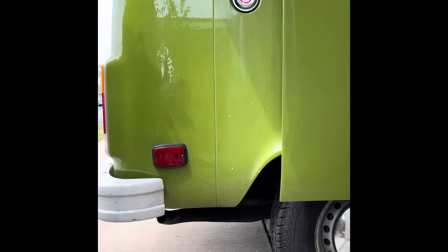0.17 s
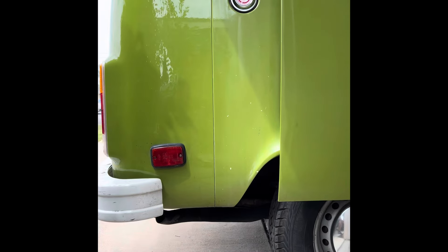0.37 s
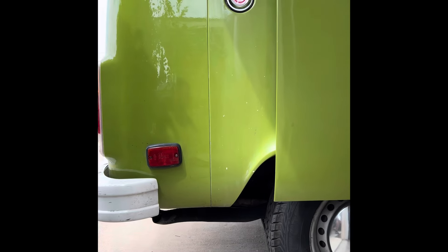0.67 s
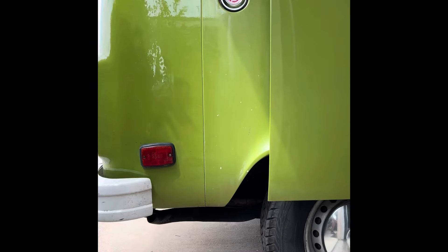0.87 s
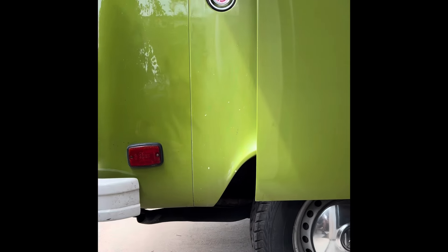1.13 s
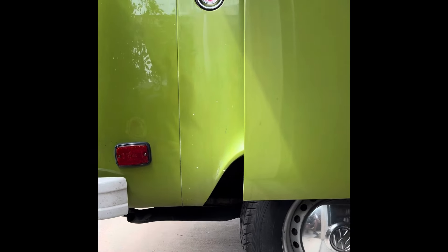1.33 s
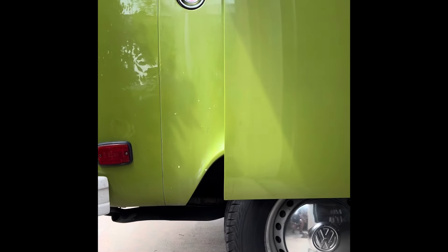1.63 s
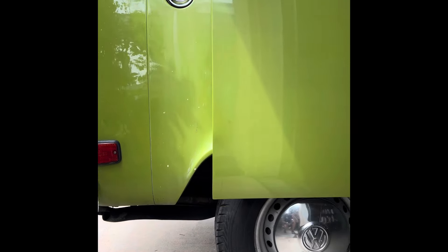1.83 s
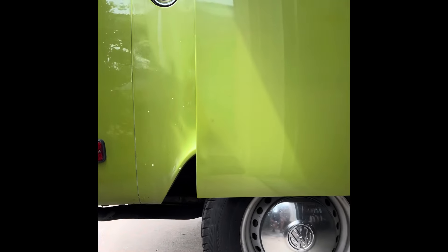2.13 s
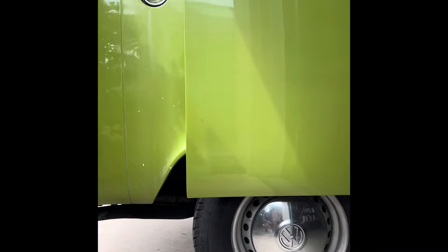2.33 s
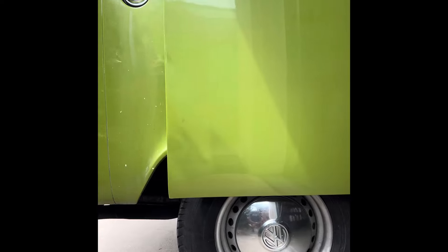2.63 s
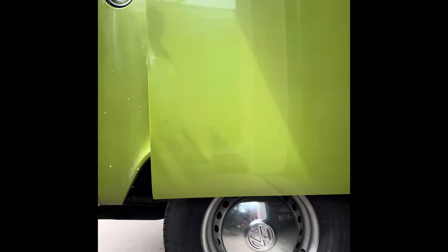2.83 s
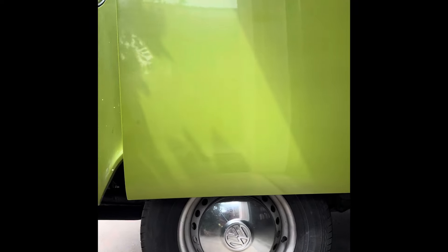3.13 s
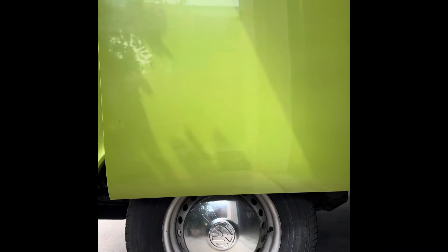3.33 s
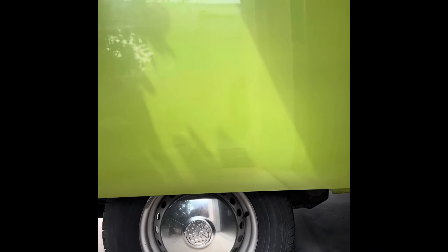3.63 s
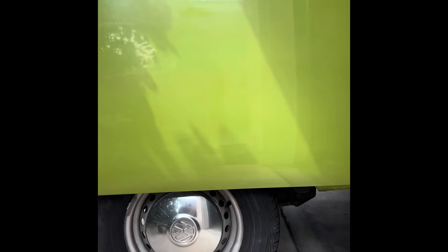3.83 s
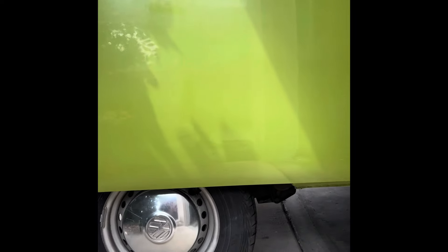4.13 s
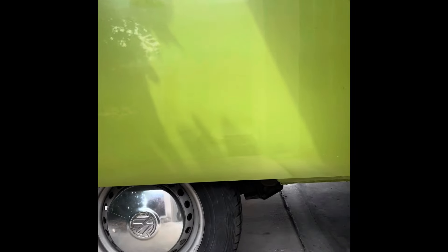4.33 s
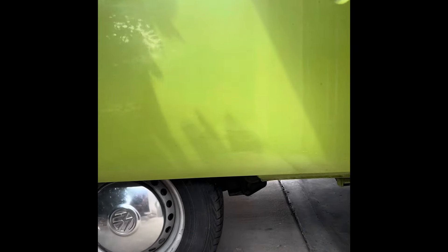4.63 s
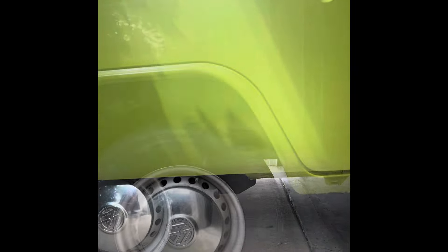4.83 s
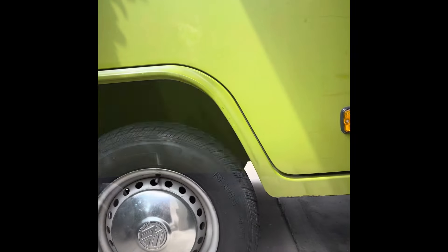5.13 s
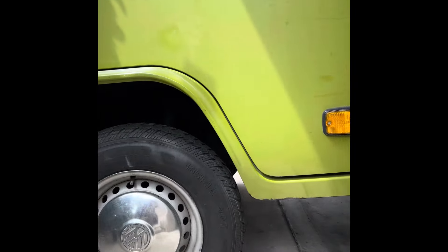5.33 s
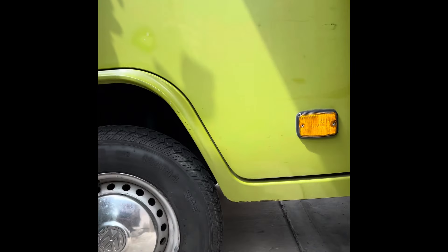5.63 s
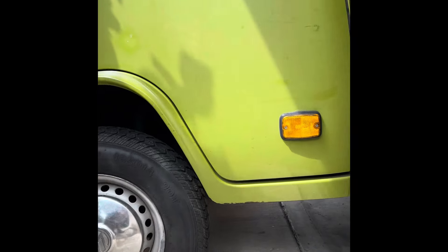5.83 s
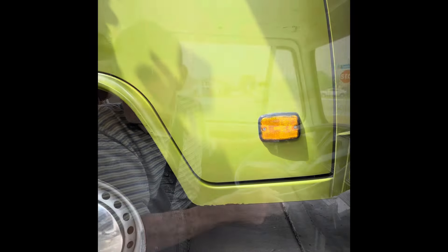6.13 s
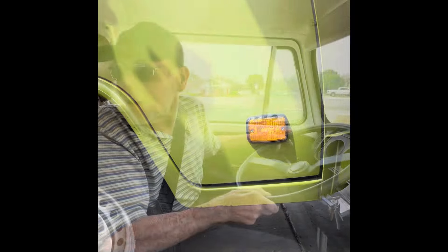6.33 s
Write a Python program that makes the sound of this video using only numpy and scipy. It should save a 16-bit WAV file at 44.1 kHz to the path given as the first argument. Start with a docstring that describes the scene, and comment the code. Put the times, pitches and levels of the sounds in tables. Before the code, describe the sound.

Outdoors, close to an old van, a phone picks up its air-cooled four-cylinder engine. It revs up quickly and holds with a deep exhaust boom and fan hiss, surges higher, then falls to a slow, uneven idle with a loose metal shield knocking and valves ticking. Near five seconds the sound becomes suddenly quieter, as if heard from beside the front wheel, and fades a little at the end.

```python
"""The exhaust of an air-cooled four-cylinder engine in the back of a van booms: waves locked to the engine cycle.
A loose shield knocks, hardest once a cycle; the valves tick as small bursts of ringing.
Shaped noise makes the rush of exhaust gas and the hiss of the cooling fan.
The engine is revved up, held and let fall to idle, then heard from beside the front wheel.
A phone listens through two microphone ports, which hear the same bass."""
import sys
import numpy as np
from scipy.fft import rfft, irfft, next_fast_len
from scipy.io import wavfile
from scipy.ndimage import uniform_filter1d, map_coordinates

SR = 44100
rng = np.random.default_rng(int(sys.argv[2]) if len(sys.argv) > 2 else 0)


def pcm_store(signal):
    """Save signal as 16-bit PCM."""
    levels = np.round(np.clip(np.atleast_2d(signal), -1, 1) * 32767)
    wavfile.write(sys.argv[1], SR, levels.astype(np.int16).T)


N = 286209

# A cycle is two turns of the crank. "Three states" are: revved, idling at the rear, idling at the front.

# waves per engine cycle (order): (level/dB in the three states), before the changes in exhaust()
ORDER_LEVELS = dict(zip( (3, 4, 5, 6, 7, 8, 9, 10, 11, 12, 13, 14, 15, 16, 17, 19, 20, 24, 28, 32, 33, 36, 40),
                [(-11.5, -16, -14), (-7, -4.5, -8), (3, -7, -19.5), (-12, -25, -24), (-7, -3, -6),
                (-3, -4, -8.5), (-6, -1.5, -2.5), (-8, -15, -10), (-5, -6.5, -9), (-3, -3, -2.5),
                (-7, -5, -1.5), (-18, -13, -11), (-12, -15.5, -7), (-6, -1, -.5), (-15, -9, -5.5),
                (-18, -12, -12.5), (-19, -2.5, -12), (-9, -14, -7.5), (-14, -17, -19.5), (-11, -16, -12.5),
                (-15, -16, -23.5), (-15, -22, -24), (-10, -17, -17.5)]))
# shape of the throb, one row per state: (middle order, a/cycles, b/cycles, c/cycles);
# phase = a + b m + c m^2, with m counted from the middle order
THROB = [(5, .99, .46, .365), (8, .5, -.045, .02), (8, .2, -.065, .13)]
# how a wave swells or sinks in the exhaust pipe: (f/Hz, level/dB)
PIPE = [(20, -13), (33, 3.5), (45, 8), (54, 12.5), (65, 11), (72, 7.5), (80, 1), (95, 2), (160, -4.5)]
# the silencer's resonance and notch: (f/Hz, level/dB)
SILENCER = [(215, 0.5), (245, 8.5), (280, 2), (570, 4), (620, -12.5)]
# factor on the wavering in the three states
UNEVEN = (.6, 1.8, 2.5)
SPREAD_BELOW_SPEED, SPREAD_PER_SPEED = 7.1, .04  # cycles/s; c gained per cycle/s below it, at the rear idle
GROW_FROM_ORDER, HELD_SPEED = 13, 14  # order; cycles/s
GROW_DB = .07  # per order above that and per cycle/s over the held speed
BURIED_DB_PER_GAIN = .03  # sinking per order and per cycle/s gained each second
# dB per cycle/s lost each second: gains of the firing and lowest orders, loss of the others
FIRING_DB_PER_SLOWING, LOWEST_DB_PER_SLOWING, OVERRUN_DB_PER_SLOWING = .2, .7, .3
OVERRUN_FROM_ORDER = 5  # lowest order that weakens


def exhaust(cycle, speed, state, level_db):
    """Waves locked to the cycle; firings are never quite alike, so each wavers, the high ones most."""
    out = np.zeros(N)
    uneven = np.array(UNEVEN) @ state
    lost, gained = slowing(speed), slowing(-speed)
    spread = SPREAD_PER_SPEED * np.maximum(SPREAD_BELOW_SPEED - speed, 0) * state[1]
    for order, strengths_db in ORDER_LEVELS.items():
        # when revved, the upper orders grow with speed but sink while it rises
        growth = GROW_DB * (speed - HELD_SPEED) - BURIED_DB_PER_GAIN * gained
        grown_db = max(order - GROW_FROM_ORDER, 0) * growth * state[0]

        # as the engine slows, the lowest and the firing orders stand out
        if order == min(ORDER_LEVELS):
            slowing_db = LOWEST_DB_PER_SLOWING
        elif order % 4 == 0:
            slowing_db = FIRING_DB_PER_SLOWING
        else:
            slowing_db = -OVERRUN_DB_PER_SLOWING * (order >= OVERRUN_FROM_ORDER)

        hz = order * speed
        db = level_db + np.array(strengths_db) @ state + grown_db + lost * slowing_db
        db = db + along(PIPE, hz) + along(SILENCER, hz)

        # blend the phases of the three states as arrows on a circle
        arrows = [np.exp(2j * np.pi * (a + b * (order - m) + c * (order - m) ** 2)) for m, a, b, c in THROB]
        throb = np.angle(np.array(arrows) @ state)
        spread_cycles = spread * (order - THROB[1][0]) ** 2
        phase_waver = .45 * np.tanh(uneven * (order / 22) ** 2) * wobble(9)
        phase = 2 * np.pi * (order * cycle + spread_cycles) + throb + phase_waver
        level_waver_db = uneven * (.5 + .03 * order) * wobble(8)
        out += amp(db + level_waver_db) * np.sqrt(2) * np.cos(phase)
    return out


# ringing of the shield, before its tuning: (f/Hz, level/dB, t60/s)
SHIELD_MODES = [(722, 0, .075), (790, -9, .05), (665, -9, .05), (575, -14, .05)]
# factor on those frequencies in the three states
SHIELD_TUNE = (.965, 1.012, 1.022)
# one hard blow and lighter ones between: (share of the cycle, (level/dB in the three states))
BLOWS = [(.985, (0, 0, 0)), (.36, (-16, -11, -30)), (.25, (-30, -30, -9)), (.74, (-18, -16, -9))]
# level/dB of the rebound in the three states, before it fades with speed when revved
REBOUND_DB = (3, -5, -6)
KNOCK_FROM_SPEED, KNOCK_SPEED_SPAN = 14.38, .6  # cycles/s: where knocks start to harden, and how gradually
KNOCK_FAST_DB, KNOCK_DB_PER_SLOWING = 5, .21  # most gained by speed; dB per cycle/s lost each second
REBOUND_SHARE, REBOUND_SPEED = .14, 13.5  # of the cycle; cycles/s at which it is strongest when revved
REBOUND_DB_PER_SPEED, REBOUND_FADE_DB = 12, 12  # dB lost per cycle/s away from that, at most


def shield(cycle, speed, state, db):
    """Soft contacts swell before they peak; most strike harder at high speed and while the engine slows."""
    tune = np.array(SHIELD_TUNE) @ state
    fast = np.maximum(speed - KNOCK_FROM_SPEED, 0)
    hard_db = db + KNOCK_FAST_DB * np.tanh(fast / KNOCK_SPEED_SPAN) + KNOCK_DB_PER_SLOWING * slowing(speed)
    rebound_fade_db = np.minimum(REBOUND_DB_PER_SPEED * abs(speed - REBOUND_SPEED), REBOUND_FADE_DB)
    rebound_db = db + np.array(REBOUND_DB) @ state - state[0] * rebound_fade_db
    contacts = [(share, hard_db + np.array(blow_db) @ state) for share, blow_db in BLOWS]
    contacts.append((REBOUND_SHARE, rebound_db))
    return sum(strikes(cycle, share, SHIELD_MODES, amp(level_db), scatter_db=1.3, jitter=.003, rise=.013,
                       detune=.008, smear=.8, tune=tune)
               for share, level_db in contacts)


# valves closing: (share of the cycle, level/dB of the tappet ring, level/dB of the cover clack)
VALVES = [(0.161, 1, 4), (0.299, -18, 4), (.43, -0.5, 3.5), (0.679, -1, 8.5), (0.921, -25, 2)]
# ringing of the tappets: (f/Hz, level/dB, t60/s)
TAPPET_MODES = [(6450, -10, 0.033), (7170, -18, .04), (7700, -2.5, 0.045), (7900, -15, 0.027),
                (8370, -3.5, 0.11), (8950, -3, 0.078), (9800, -6.5, 0.06)]
# ringing of the rocker cover: (f/Hz, level/dB, t60/s)
COVER_MODES = [(1961, -8, .035), (2340, -6, .035), (2482, -8, .035), (3150, -6, .03), (4270, -10, .045),
               (4520, -8, .035)]


def valves(cycle, tappet_db, cover_db):
    """Each valve landing on its seat rings the tappets and clacks in the rocker cover."""
    out, same_pitch = np.zeros(N), np.ones(N)
    for share, ring_db, clack_db in VALVES:
        out += strikes(cycle, share, TAPPET_MODES, amp(tappet_db + ring_db), scatter_db=4.5, jitter=.02,
                       rise=.006, detune=.013, smear=3, tune=same_pitch)
        out += strikes(cycle, share, COVER_MODES, amp(cover_db + clack_db), scatter_db=2.5, jitter=.02,
                       rise=.005, detune=.03, smear=3, tune=same_pitch)
    return out


# colour of the gas noise, one table per state: (f/Hz, level/dB)
GAS_REVVED = [(53, -4.5), (90, -10), (118, -10), (168, -19), (266, -21), (456, -21.5), (510, -23),
              (549, -24), (598, -32), (701, -24), (875, -25), (1090, -20.5), (1480, -36), (1700, -28.5),
              (2210, -71), (3740, -120)]
GAS_IDLE = [(53, -44), (90, -7.5), (158, -3.5), (195, -16), (232, -20), (289, -21), (440, -22), (569, -24),
            (737, -17.5), (823, -22.5), (966, -19.5), (1180, -27), (1450, -37), (1700, -48), (2210, -63),
            (3740, -120)]
GAS_FRONT = [(53, -50), (90, -21), (121, 0.5), (193, -13.5), (226, -13), (269, -16), (366, -36),
             (440, -24.5), (497, -24.5), (569, -13), (628, -23.5), (755, -16), (954, -20.5), (1700, -32.5),
             (2210, -63), (3740, -120)]


def gas(cycle, state, db):
    """Exhaust gas is rushing noise, a little stronger at each of the four firings in a cycle."""
    puffs = 1 + .18 * np.cos(2 * np.pi * 4 * cycle)
    return amp(db + .4 * wobble(6)) * puffs * rush((GAS_REVVED, GAS_IDLE, GAS_FRONT), state)


# colour of the fan noise, one table per state: (f/Hz, level/dB)
FAN_REVVED = [(820, -2), (1400, -2), (1490, -8), (1970, -2), (2140, -5), (2420, -1), (3440, -7.5),
              (4430, -8.5), (5320, -12), (7660, -8), (9760, -15), (11200, -28), (14800, -25.5),
              (15700, -26)]
FAN_IDLE = [(820, 0.5), (1400, -4), (2080, -3.5), (2370, 0), (2810, -4.5), (3440, -7), (3810, -5),
            (5210, -12.5), (6190, -6), (7970, -6.5), (9190, -10.5), (11800, -29.5), (14300, -24),
            (15700, -27)]
FAN_FRONT = [(820, 4), (1400, -4.5), (2010, -2.5), (2780, -3), (2930, -3), (4130, -5), (5110, -10),
             (6780, -4.5), (7500, -2), (8220, -7), (8910, -4.5), (11100, -20.5), (14900, -18.5),
             (15700, -16)]


def fan(cycle, state, db):
    """The cooling fan is hissing noise; the valve gear adds a burst of rattle at each valve landing."""
    clacks = [(share, clack_db) for share, _, clack_db in VALVES]
    bursts = uniform_filter1d(pulses(cycle, clacks, width=.13), 200)
    rattle = 1 + .33 * bursts * amp(4 * np.tanh(wobble(25)))
    return amp(db + 1 + .38 * wobble(7.07)) * rattle * rush((FAN_REVVED, FAN_IDLE, FAN_FRONT), state)


# how alike left and right are: (f/Hz, likeness from 0 to 1)
ALIKE = [(200, 1), (240, .93), (640, .86), (1410, .88), (2500, .72), (4500, .68), (8000, .76), (13000, .45)]
RUSH_LOW_HZ = 75  # below this the noise fades and the boom is heard almost alone


def rush(spectra, shares):
    """Stereo noise passes from one colour to the next, each colour evened to rms 1 before mixing."""
    def mid_side(hz):
        angle = np.arccos(np.clip(along(ALIKE, hz), -1, 1)) / 2
        return [np.cos(angle), np.sin(angle)] / (1 + (RUSH_LOW_HZ / (hz + 1)) ** 3)

    mid, side = filtered(rng.standard_normal((2, N)), mid_side)
    pair = np.array([mid + side, mid - side])
    return sum(share * unit(filtered(pair, lambda hz: amp(along(points, hz))))
               for points, share in zip(spectra, shares))


def strikes(cycle, share, modes, level, scatter_db, jitter, rise, detune, smear, tune):
    """One blow at this share of every cycle sets off fading tones, each at a new strength."""
    out, t = np.zeros(N + SR), np.arange(SR // 12) / SR
    hz, db, t60 = np.transpose(modes)[..., None]
    for turn in np.arange(np.ceil(cycle[0] - share), cycle[-1] - share):
        phase_luck, pitch_luck, level_luck = rng.standard_normal((3, len(modes), 1))
        moment = turn + share + jitter * phase_luck[0, 0]  # in cycles
        # start early, so that the peak falls on the moment
        at = max(np.searchsorted(cycle[:-1], moment) - round(rise * SR), 0)
        swell = np.sin(np.pi / 2 * np.minimum(t / rise, 1)) ** 2
        fade = amp(db + scatter_db * level_luck - 60 * np.maximum(t - rise, 0) / t60)
        tone_hz = hz * tune[at] * (1 + detune * pitch_luck)
        tones = np.sin(2 * np.pi * tone_hz * (t - rise) + smear * phase_luck)
        out[at:at + len(t)] += level[at] * np.sum(swell * fade * tones, axis=0)
    return out[:N]


def pulses(cycle, places, width):
    """A bump at each (share of the cycle, level/dB), fast up and slowly down."""
    return sum(amp(db) * np.exp(-((cycle - share) % 1) / width) for share, db in places)


def slowing(speed):
    """Cycles a second lost each second, smoothed over a fifth of a second."""
    return np.maximum(-uniform_filter1d(np.gradient(speed) * SR, size=SR // 5), 0)


def amp(db):
    """Gain of a level in dB."""
    return 10 ** (np.asarray(db) / 20)


def unit(x):
    """x at rms 1."""
    return x / np.sqrt(np.mean(x ** 2) + 1e-20)


def along(points, hz):
    """Read a curve of (f/Hz, value) points on a log axis."""
    f, v = np.transpose(points)
    return np.interp(np.log(hz + 1), np.log(f + 1), v)


def curves(rows):
    """One value per sample for each column after the time."""
    s, *cols = np.transpose(rows)
    return np.array([np.interp(np.arange(N) / SR, s, c) for c in cols])


def wobble(rate):
    """A random curve through rate new points a second."""
    return map_coordinates(rng.standard_normal(int(N * rate / SR) + 4), [np.arange(N) * rate / SR])


def filtered(x, response):
    """x times a response of frequency."""
    m = next_fast_len(N + 8192)
    return irfft(rfft(x, m) * response(np.fft.rfftfreq(m, 1 / SR)), m)[..., :N]


# engine speed: (t/s, speed in cycles/s)
SPEED = [(0.0, 7.84), (0.18, 9.67), (0.45, 13.65), (0.58, 14.16), (1.07, 13.46), (1.49, 13.83),
         (2.11, 14.67), (2.3, 15.55), (2.39, 16.0), (2.56, 13.4), (2.81, 9.97), (3.2, 6.28), (3.61, 6.13),
         (4.15, 7.27), (4.81, 7.41), (5.01, 7.28), (5.13, 6.72), (5.72, 7.05), (6.49, 6.89)]
# loudness at the phone, from throttle and distance; every part follows it: (t/s, level/dB)
LEVEL = [(0, -30.5), (.15, -29), (.45, -27), (1.2, -28), (1.9, -27), (2.35, -26), (2.6, -29), (2.9, -33),
         (3.25, -35.5), (3.7, -35), (4.2, -34), (4.7, -35), (5.05, -43), (5.5, -41), (6.15, -42.5),
         (6.49, -47)]
# blend of the three states: (t/s, share revved, share idling at the rear, share idling at the front)
STATE = [(0, 1, 0, 0), (2.4, 1, 0, 0), (3.1, 0, 1, 0), (4.75, 0, 1, 0), (5.0, 0, 0, 1)]
# base level/dB of each part against LEVEL, in the three states; fan() adds 1 dB
GAS_DB = (-.2, .8, 2.6)
FAN_DB = (-4, -5.5, -4)
KNOCK_DB = (-.5, 5, 8)
TAPPET_DB = (-19, -10.5, -4.5)
COVER_DB = (-9.5, -11, -18)
COVER_DB_PER_SPEED = 2.2  # the cover clacks harder: dB per cycle/s above the held speed
START = .402  # share of the cycle gone at time 0


def scene():
    """One crank drives all the engine parts, and their sounds add up."""
    speed, level_db = curves(SPEED)[0], curves(LEVEL)[0]
    cycle = START + np.cumsum(speed) / SR
    state = curves(STATE)
    parts_db = np.array([GAS_DB, FAN_DB, KNOCK_DB, TAPPET_DB, COVER_DB]) @ state
    gas_db, fan_db, knock_db, tappet_db, cover_db = level_db + parts_db
    cover_db = cover_db + COVER_DB_PER_SPEED * np.maximum(speed - HELD_SPEED, 0)
    return (exhaust(cycle, speed, state, level_db)
            + shield(cycle, speed, state, knock_db)
            + valves(cycle, tappet_db, cover_db)
            + gas(cycle, state, gas_db)
            + fan(cycle, state, fan_db))


# left minus right: (f/Hz, level/dB)
LEAN = [(200, 0), (300, -2.5), (700, -2.7), (1400, -2.4), (2500, 1), (4500, 0)]
# the two ports hear the engine by different paths: (f/Hz, radians by which left leads)
LEAD = [(200, 0), (330, -0.24), (860, -0.89), (1700, 0.34), (2150, 0.68), (3010, 1.37), (3790, 1.07),
        (4390, 1.1), (5430, -1.42), (9560, -1.22), (14300, -1.5)]
TOP_HZ = 15780  # nothing is kept from here up


def record(dry):
    """Above the bass the two microphone ports differ in level and timing; the very top is cut off."""
    def ports(hz):
        halves = [.5, -.5]  # left, right
        return amp(np.outer(halves, along(LEAN, hz))) * np.exp(1j * np.outer(halves, along(LEAD, hz)))

    return filtered(dry, lambda hz: ports(hz) * (hz < TOP_HZ))


dry = scene()
out = record(dry)
pcm_store(out)
```